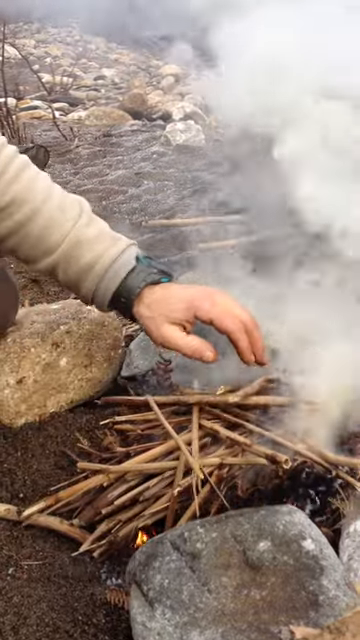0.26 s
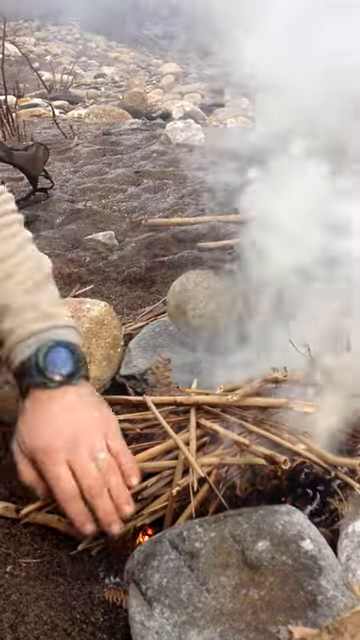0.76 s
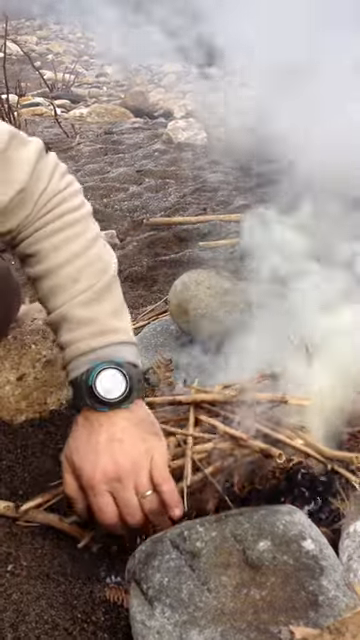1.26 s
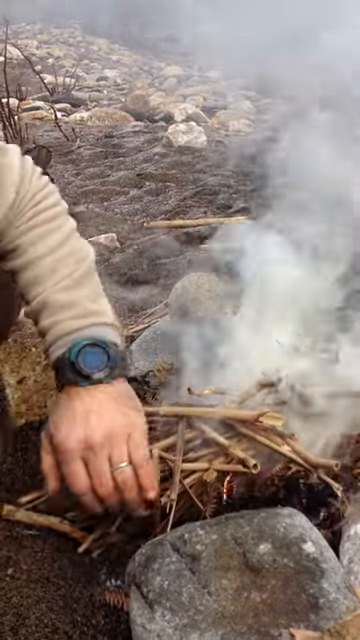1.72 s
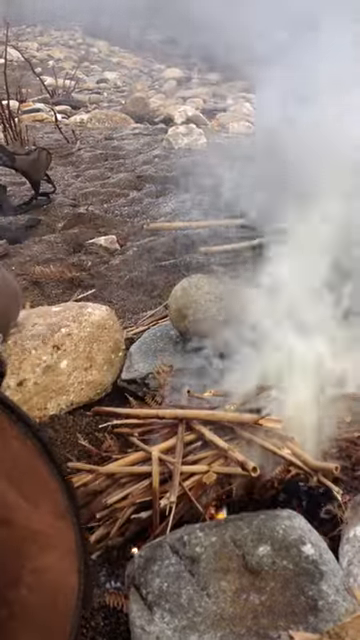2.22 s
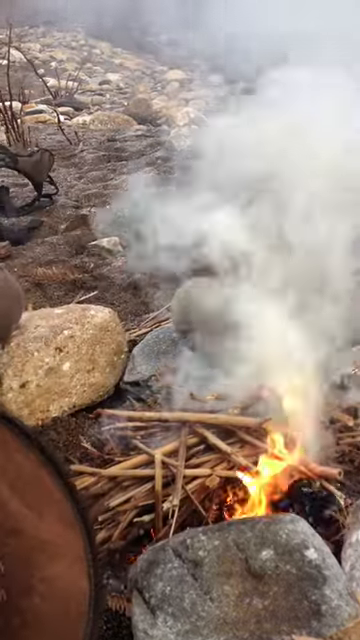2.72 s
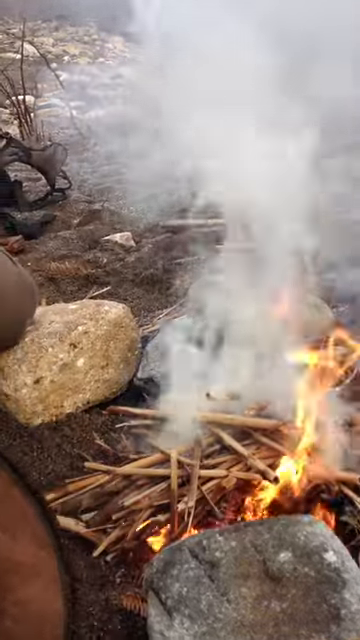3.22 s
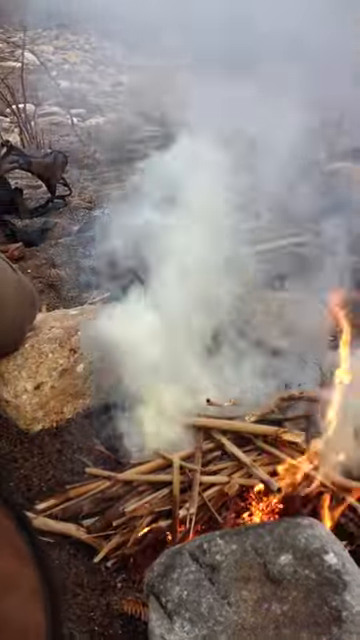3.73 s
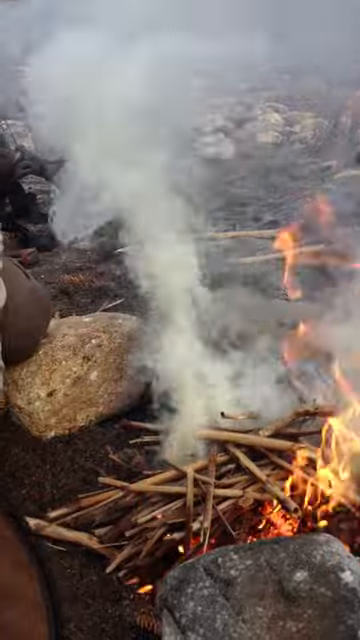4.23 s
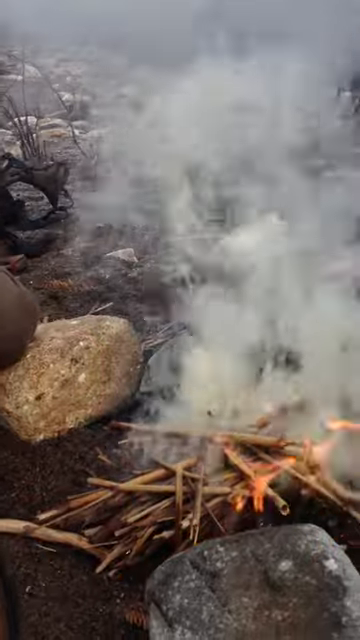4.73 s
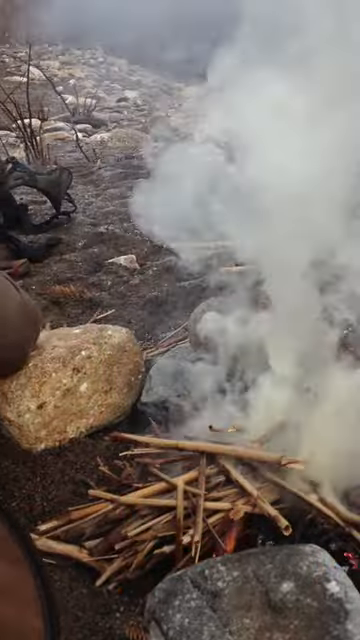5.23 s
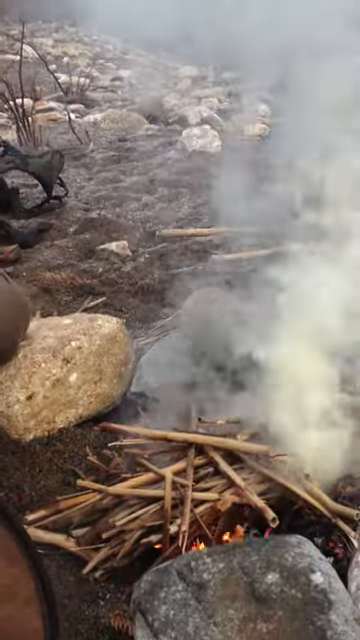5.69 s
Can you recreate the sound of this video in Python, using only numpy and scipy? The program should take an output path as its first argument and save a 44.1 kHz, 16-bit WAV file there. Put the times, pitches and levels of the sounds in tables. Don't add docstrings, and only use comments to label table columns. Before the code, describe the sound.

A small fire of dry stems snaps and sizzles close by, with one big crack, low fluttering gusts of flame and far rushing water.

```python
import sys
import numpy as np
from scipy import signal
from scipy.fft import rfft, irfft
from scipy.io import wavfile
from scipy.ndimage import uniform_filter1d

SR = 44100
rng = np.random.default_rng(int(sys.argv[2]) if len(sys.argv) > 2 else 0)


def gain_from_decibels(decibels):
    exponent = np.asarray(decibels, float) / 20
    return 10 ** exponent


def persist_wave(psi):
    counts = np.round(np.clip(psi, -1, 1) * 32767).astype(np.int16)
    wavfile.write(sys.argv[1], SR, np.atleast_2d(counts).T)


N = 262611

SPLIT_S = 1.6031
CALM_DB = -58.5
# (time [s], sizzle level [dB])
BOILING = [(0, -68), (.9, -67.5), (1.12, -64.5), (1.32, -66.5), (1.45, -63.5), (1.8, -67.5), (2.65, -71),
           (3.05, -62.5), (3.4, -58.5), (3.7, -61), (4.3, -61), (4.6, -66), (5.0, -64), (5.15, -69),
           (5.35, -62.5), (5.5, -66), (5.95, -68.5)]


def unit(x):
    return x / np.sqrt(np.mean(x ** 2))


def curve(table):
    times, levels = np.transpose(table)
    return np.interp(np.arange(N) / SR, times, levels)


def colour(x, points):
    hz, db = np.transpose(points)
    log_gain = np.interp(np.log(np.linspace(1, SR / 2, 2049)), np.log(hz), db) * np.log(10) / 20
    cepstrum = irfft(log_gain)
    cepstrum[1:2048] *= 2
    cepstrum[2049:] = 0
    impulse = irfft(np.exp(rfft(cepstrum)))[:2048]
    return unit(signal.fftconvolve(x, impulse)[:N])


def walk(rate):
    hold = int(SR / rate)
    held = rng.standard_normal(256)[np.arange(N) // hold]
    return unit(uniform_filter1d(uniform_filter1d(held, hold), hold))


def place(times, sounds):
    out = np.zeros(N + sounds.shape[1])
    starts = (times * SR).astype(int)[:, None]
    np.add.at(out, starts + np.arange(sounds.shape[1]), sounds)
    return out[:N]


def butter(x, order, hz, kind):
    return signal.sosfilt(signal.butter(order, hz, kind, fs=SR, output="sos"), x)


def far_water():
    # (frequency [Hz], density [dB per Hz])
    water_colour = [(60, -43), (100, -15), (224, -2), (365, -3.5), (640, -1), (854, -5), (1760, -8.5),
                    (2000, -10.5), (2400, -11), (3700, -16.5), (4600, -15.5), (4850, -22.5), (9800, -34.5),
                    (16000, -58)]
    # (time [s], level [dB])
    rush_swell = [(0, -53), (1.2, -52), (2.4, -53), (4.9, -53.5), (5.2, -54), (5.45, -52.5), (5.95, -51)]
    rush = colour(rng.standard_normal(N), water_colour)
    low = butter(rush, 1, 900, "lowpass")
    high = rush - low
    drifting = low * gain_from_decibels(0.35 * walk(3.86)) + high * gain_from_decibels(0.82 * walk(8.3))
    return drifting * gain_from_decibels(curve(rush_swell) + 2.0)


def fanned():
    # (start [s], hold [s], roar level [dB])
    gust_table = [
        (2.54, .02, -52),
        (2.78, .1, -52),
        (2.98, 0.47, -47.5),
        (3.758, .22, -48),
        (4.07, .28, -47),
        (4.954, .05, -56),
    ]
    rise_db_s, fall_db_s = 57, 90
    t = np.arange(N) / SR
    power = gain_from_decibels(CALM_DB) ** 2
    for start, hold, db in gust_table:
        before = np.maximum(start - t, 0)
        after = np.maximum(t - start - hold, 0)
        power = power + gain_from_decibels(db - rise_db_s * before - fall_db_s * after) ** 2
    return 10 * np.log10(power)


def flame():
    # (frequency [Hz], density [dB per Hz])
    roar_colour = [(30, -34), (70, -11), (110, -10.5), (170, -1.5), (240, -4), (330, -10), (500, -22),
                   (900, -45.5)]
    return colour(rng.standard_normal(N), roar_colour) * gain_from_decibels(fanned() - 1.0 + 1.6 * walk(25))


def sizzle(count=3000):
    # (frequency [Hz], density [dB per Hz])
    sizzle_colour = [(2000, -17), (4500, -17), (6000, -5), (7700, -0.5), (9000, -7), (10200, -12),
                     (12500, -5), (15000, -8.5), (16500, -47)]
    # (time [s], half length [s], rise [dB])
    steam_jets = [
        (1.44, .03, 3),
    ]
    when, pitch, cycles, size = rng.random((count, 4)).T[:, :, None]
    hz, t = 4500 * 3.3 ** pitch, np.arange(96) / SR
    db = np.minimum(-4.5 * np.log(size), 12) + 7.0 * pitch
    decay = np.exp(-hz * t / (0.36 + 1.6 * cycles ** 2))
    bursts = gain_from_decibels(db) * np.sin(2 * np.pi * hz * t) * decay
    ticks = unit(place(when[:, 0] * N / SR, bursts) * gain_from_decibels(2.2 * walk(14)))
    steam_db = 2.2 * walk(36)
    for time, half, rise in steam_jets:
        steam_db = steam_db + rise * np.exp(-((np.arange(N) / SR - time) / half) ** 2)
    steam = rng.standard_normal(N) * gain_from_decibels(steam_db)
    return colour(gain_from_decibels(-2.5) * ticks + steam, sizzle_colour) * gain_from_decibels(curve(BOILING))


def gas_puffs():
    # (time [s], peak level [dB])
    puff_table = [(0.3297, -36), (0.698, -36), (0.9238, -37), (2.7732, -35), (2.9794, -33), (3.0845, -38),
                  (3.1302, -32.5), (3.3232, -29), (3.4015, -38), (4.5896, -25.5)]
    push_ms, rebound_ms = 0.082, 0.41
    times, db = np.transpose(puff_table)
    ms = np.arange(256) / SR * 1000

    def push(peak_ms):
        return ms / peak_ms * np.exp(1 - ms / peak_ms)

    puff = push(push_ms) - push_ms / rebound_ms * push(rebound_ms)
    return place(times - push_ms / 1000, gain_from_decibels(db)[:, None] * puff)


def faint_ticks(count=110):
    times = rng.random(count) * (N - 1) / SR
    size, spit = rng.standard_normal((count, 2)).T
    boil = curve(BOILING)
    harder = boil[(times * SR).astype(int)] - boil.mean()
    crack_db = -45 + 3 * size + 0.62 * harder
    return np.transpose([times, crack_db, -1.5 + 4 * spit])


def burst_stems(pop_rows):
    # (centre [Hz], width [Hz])
    stem_rings = [
        (2450, 1600),
        (4200, 1400),
        (7400, 3100),
        (12700, 5000),
    ]
    times, crack_db, wall_db, tube_db, spit_db, tear_ms = np.transpose(pop_rows)
    ms = np.arange(512) / SR * 1000
    tear = rng.standard_normal((len(times), 512))
    tear *= np.exp(-ms / (.55 * tear_ms[:, None])) + gain_from_decibels(-12) * np.exp(-ms / 1.7)
    tear[:, 0] = 2.8 / tear_ms
    sound = 0
    for (hz, width), db in zip(stem_rings, (wall_db, tube_db, 0 * times, spit_db)):
        tear = -tear
        ringing = butter(tear, 2, [hz - width / 2, hz + width / 2], "bandpass")
        energy = np.sum(ringing ** 2, axis=1)
        sound = sound + ringing * (gain_from_decibels(crack_db + db - 0.23) / np.sqrt(energy))[:, None]
    return place(times, sound)


def pops():
    # (time [s], crack [dB], stem tube [dB re crack], spit [dB re crack])
    snap_table = [(0.3297, -23, -9, -18), (0.698, -18, -9, -12), (0.9238, -21.5, -14, -8),
                  (1.1431, -30, -11, -8), (1.2174, -30.5, -9, -9), (1.272, -34, -5, 1),
                  (1.9112, -31.5, -7, -4), (2.5857, -31.5, -21, -2), (2.6988, -32, -6, -2),
                  (2.7225, -22, -15, -14), (2.7732, -24, -16, -2), (2.9509, -30, -13, -19),
                  (2.9794, -17.5, -20, -6), (3.0182, -28.5, -7, -11), (3.0601, -6, -5.5, -12),
                  (3.0845, -30, -11, -1), (3.1302, -15, -10, -13), (3.1498, -35, -4, -15),
                  (3.176, -35, -7, -2), (3.1895, -31, -9, -3), (3.3044, -27, -12, -3),
                  (3.4015, -18.5, -11, -13), (3.9482, -30, -12, -9), (3.9686, -30, -13, -13),
                  (4.2999, -35, -12, -1), (4.3473, -31, -8, -2), (4.6227, -32, -10, -5),
                  (4.9684, -28, -8, -7), (5.3751, -29.5, -11, -5), (5.6048, -34.5, -7, -4)]
    # (time [s], crack [dB], spit [dB re crack], tearing time [ms])
    tear_table = [(0.187, -33, -6, .8), (0.5538, -29.5, 1, 1.2), (1.0543, -32, -5, 1.2),
                  (1.2937, -35, -3, .8), (1.5507, -36, -4, .7), (1.6385, -31, -11, 1.4),
                  (1.7387, -30, -5, 3.7), (1.8914, -30.5, -5, 2.0), (1.9501, -33.5, -8, .8),
                  (3.0664, -28, -12, 2.1), (3.1984, -32, -3, 1.3), (3.2959, -33, -3, 1.7),
                  (3.3126, -31, 5, 1.2), (3.326, -31, 1, 1.8), (3.377, -27.5, -6, .9),
                  (3.5099, -30, -6, 1.0), (3.603, -32, -6, 2.6), (3.6649, -30, -6, 1.3),
                  (3.6994, -29.5, -5, 1.1), (3.7525, -23.5, -9, 1.1), (3.9026, -33, -13, 2.5),
                  (4.1515, -28, -7, 1.6), (4.2593, -34.5, -6, 2.8), (4.524, -33, -4, 1.2),
                  (4.6076, -28, -4, 4.0), (4.9371, -30, -1, 1.0), (4.9404, -16, -12, 2.6),
                  (5.2522, -30, -9, .8), (5.7553, -27.5, -28, 1.4), (5.8996, -23.5, -2, 1.1)]
    # (time [s], crack [dB], wall [dB re crack], tube [dB re crack], spit [dB re crack])
    knock_table = [(0.7556, -42, 9, -11, 2), (1.2144, -37, 6, -11, -2), (1.4436, -33, -10, -1, -3),
                   (1.4938, -36, 2, -1, -13), (3.323, -23, -4, -12, 2), (3.5042, -36, 4, -6, 2),
                   (4.5899, -28, 2, 5.5, -14), (4.9073, -42, -4, 13.5, -19), (4.9394, -23.5, -17, 8.5, -10),
                   (4.9462, -30, -14, -3, -23), (4.9501, -37, -7, 2, -13), (5.8059, -30, 4, -3, -9),
                   (5.85, -24.5, 8.5, -1, -28), (5.8533, -29.5, 6, 4, -24), (5.8586, -31, 3, -4, -25)]
    # (time [s], crack [dB], spit [dB re crack])
    tick_table = [(0.2709, -36, -11), (0.5714, -40, 2), (0.7256, -36, -5), (1.155, -35, 2),
                  (1.6255, -37, -6), (1.9635, -40, -6), (2.0323, -43, -7), (2.058, -40, -20),
                  (2.161, -41, -3), (2.1725, -40, -4), (2.2362, -40, 0), (2.3814, -41, -2),
                  (2.9363, -36, -10), (3.0969, -37, -2), (3.3696, -36, -7), (3.4621, -35, -12),
                  (3.49, -36, 0), (3.5652, -37, -1), (3.5923, -36, -3), (3.7175, -35, -7),
                  (3.8737, -35, -4), (4.3711, -36, 4), (4.7548, -36, -2), (4.8107, -35, -7),
                  (4.9843, -34, -4), (5.0545, -37, -3), (5.326, -34, -10), (5.3902, -35, 0),
                  (5.4207, -34.5, -2), (5.5736, -35, -11)]
    rows = [(s, crack, -15, tube, spit, .5) for s, crack, tube, spit in snap_table]
    rows += [(s, crack, -11, -11, spit, ms) for s, crack, spit, ms in tear_table]
    rows += [(*knock, 1.2) for knock in knock_table]
    rows += [(s, crack, -27, -8, spit, .6) for s, crack, spit in list(tick_table) + list(faint_ticks())]
    return burst_stems(rows)


def struck(modes, start):
    t = np.maximum(np.arange(N) / SR - start, 0)
    out = np.zeros(N)
    for hz, db, t60 in modes:
        out += gain_from_decibels(-11 + db) * np.sin(2 * np.pi * hz * t) * np.exp(-np.log(1000) * t / t60)
    return out


def scatter(x):
    spray_db, start_ms, fade_ms = -11, .5, 1.8
    ms = np.arange(600) / SR * 1000
    spray = rng.standard_normal(len(ms)) * np.exp(-ms / fade_ms) * (ms > start_ms)
    spray /= np.sqrt(np.sum(spray ** 2))
    return x + gain_from_decibels(spray_db) * signal.fftconvolve(x, spray)[:N]


def big_crack():
    # (frequency [Hz], level [dB], t60 [s])
    crack_modes = [(3800, -39, .008), (4540, 0, 0.0098), (5440, -6, 0.0038), (6320, -1, 0.0042),
                   (7240, -2, 0.0024), (8500, -22, 0.0051), (11600, -19, 0.002), (14300, -31, .004)]
    # (frequency [Hz], level [dB], t60 [s])
    body_modes = [(215, -15.5, 0.038), (417, -16, 0.011), (750, -12, 0.014), (1500, -12, 0.010),
                  (1970, -16, 0.0094)]
    crack = butter(struck(crack_modes, SPLIT_S), 2, 3100, "highpass")
    knock = butter(struck(body_modes, SPLIT_S + 0.39 / 1000), 2, 140, "highpass")
    return scatter(crack) + knock


def scene():
    return (far_water() + flame() + sizzle() + gas_puffs() + pops() + big_crack())[None]


def band_limit(x):
    return signal.sosfilt(signal.butter(12, 16470, fs=SR, output="sos"), x)


def record(dry):
    duck_db, recovery_s = -2, 0.4
    after = np.arange(N) / SR - SPLIT_S - .02
    onset = np.clip(after / 0.01, 0, 1)
    x = dry * gain_from_decibels(duck_db * np.exp(-np.maximum(after, 0) / recovery_s) * onset)
    x = butter(x, 4, 112, "highpass")
    hum = unit(butter(rng.standard_normal(N), 1, 300, "lowpass"))
    x = x + gain_from_decibels(-82.5 + 0.44 * (fanned() - CALM_DB)) * hum
    x = signal.sosfilt(signal.ellip(6, .5, 26, 15250, fs=SR, output="sos"), x)
    return band_limit(x)


dry = scene()
out = record(dry)
persist_wave(out)
```